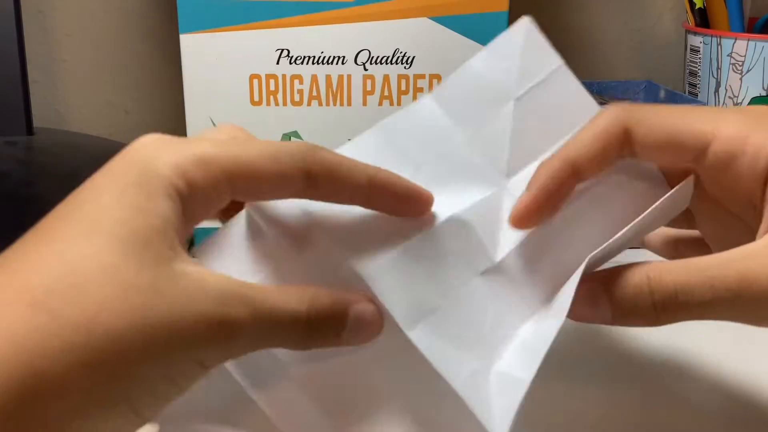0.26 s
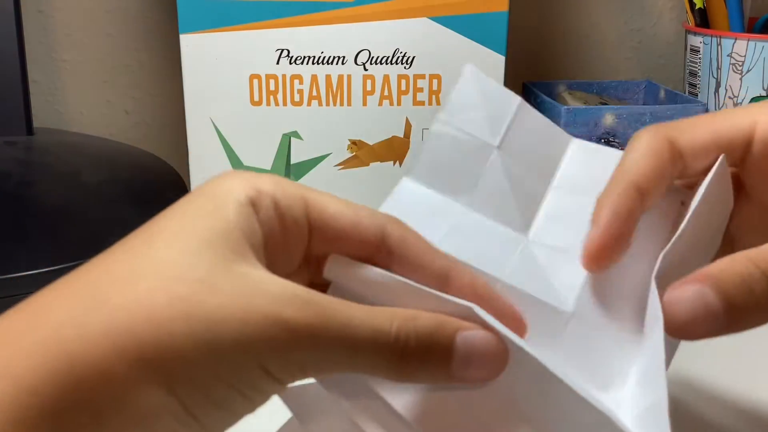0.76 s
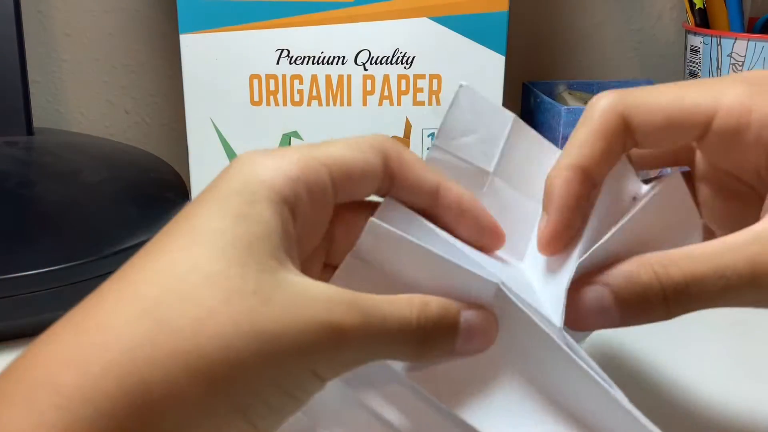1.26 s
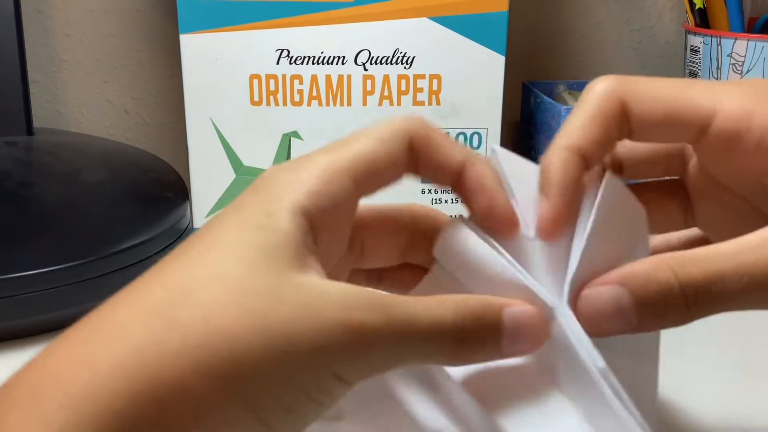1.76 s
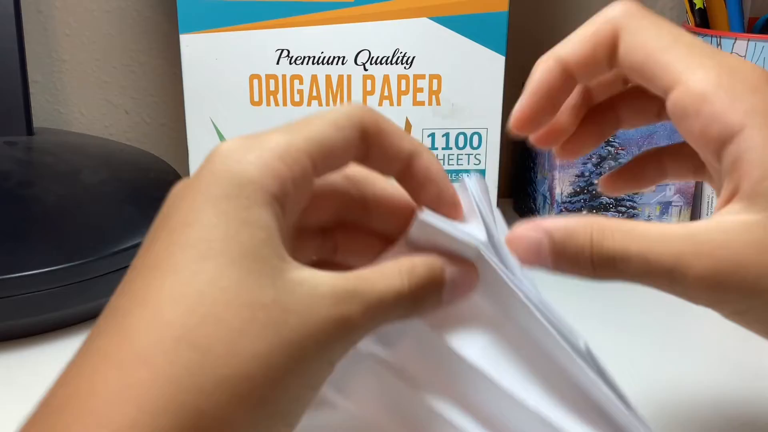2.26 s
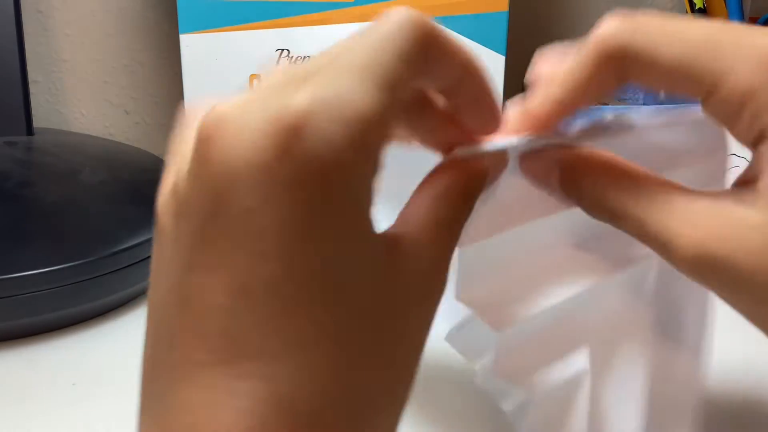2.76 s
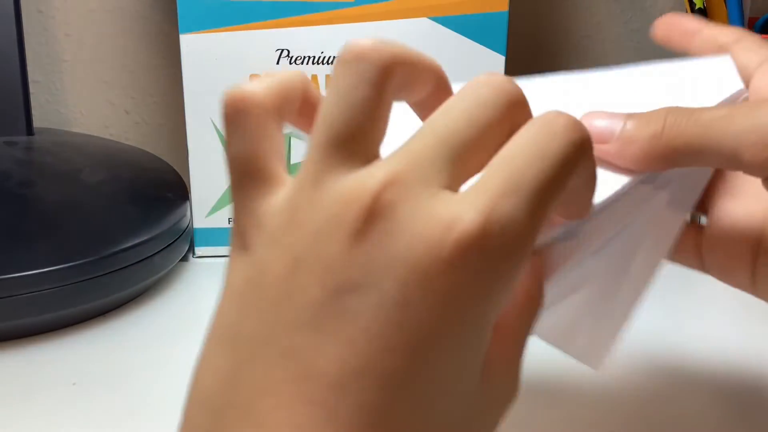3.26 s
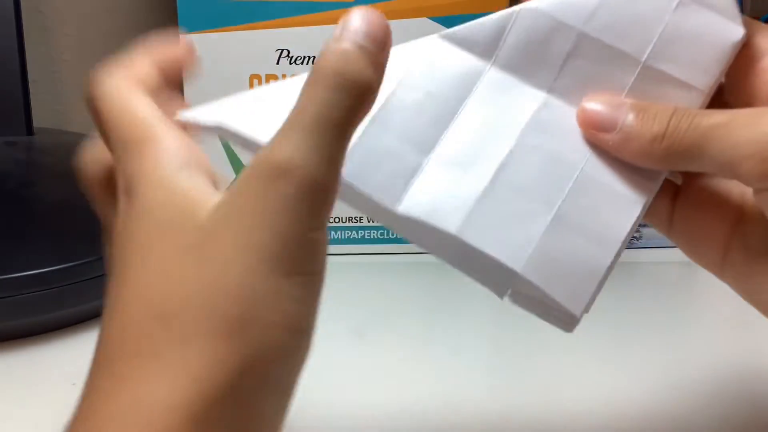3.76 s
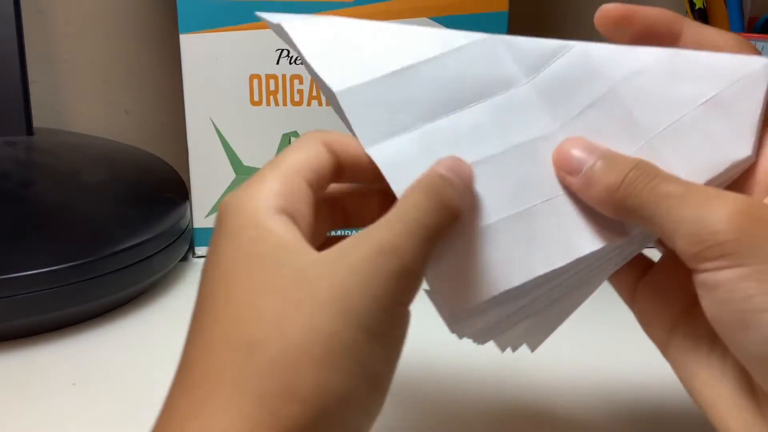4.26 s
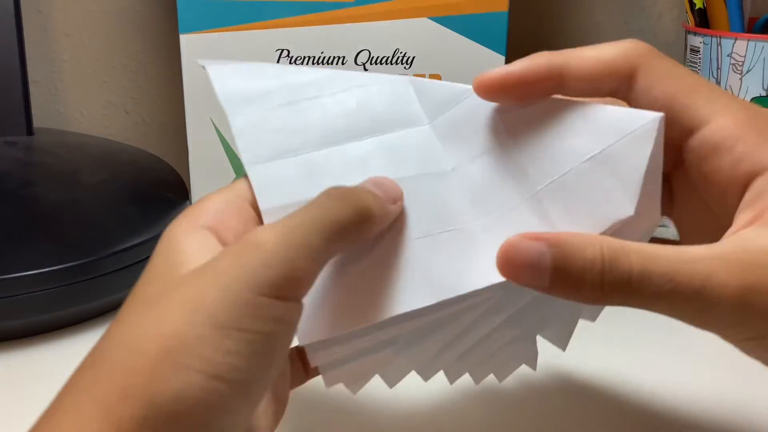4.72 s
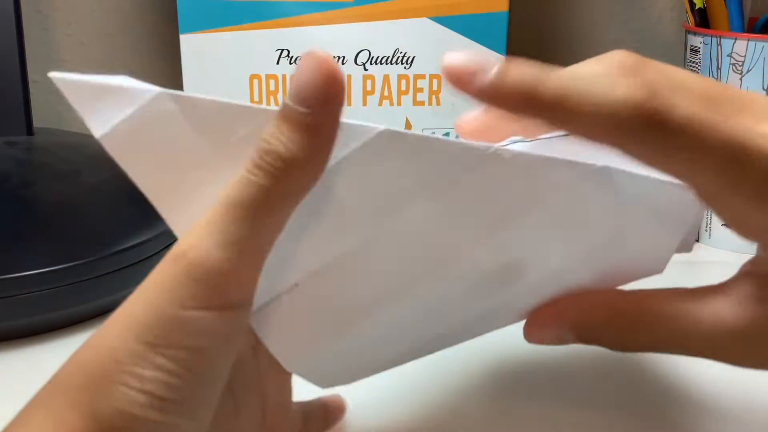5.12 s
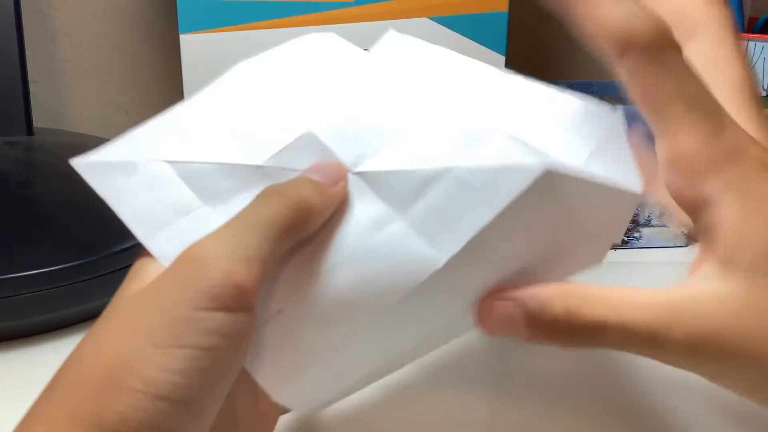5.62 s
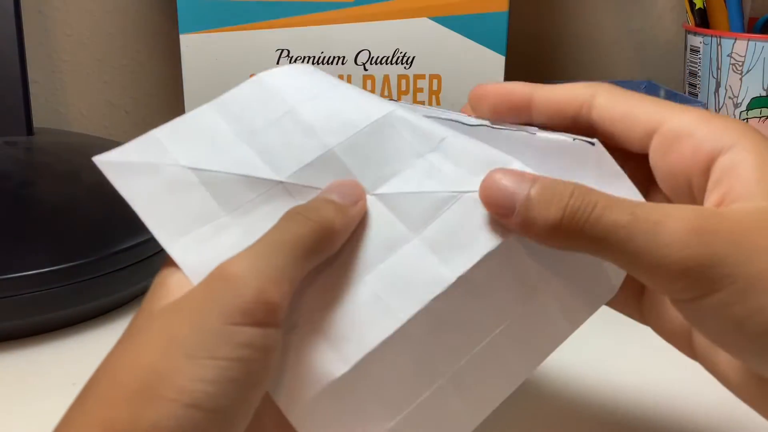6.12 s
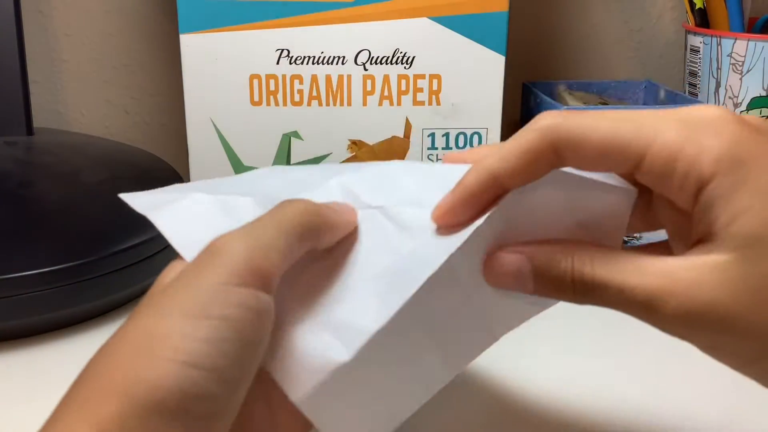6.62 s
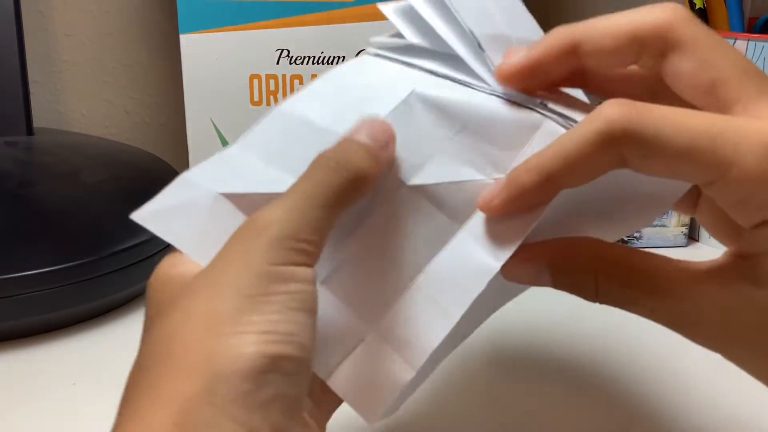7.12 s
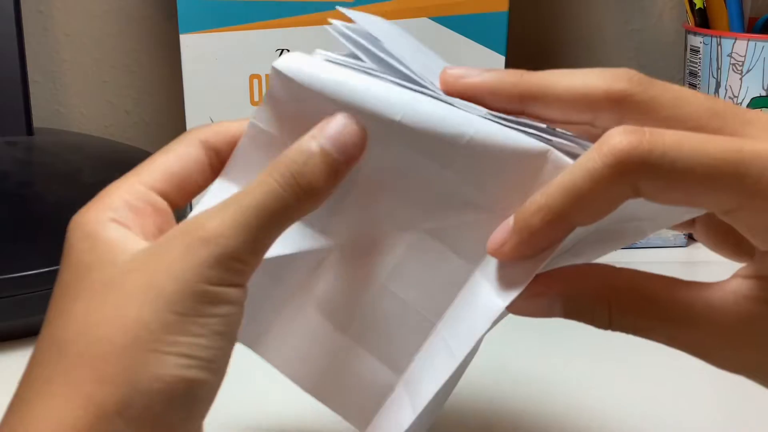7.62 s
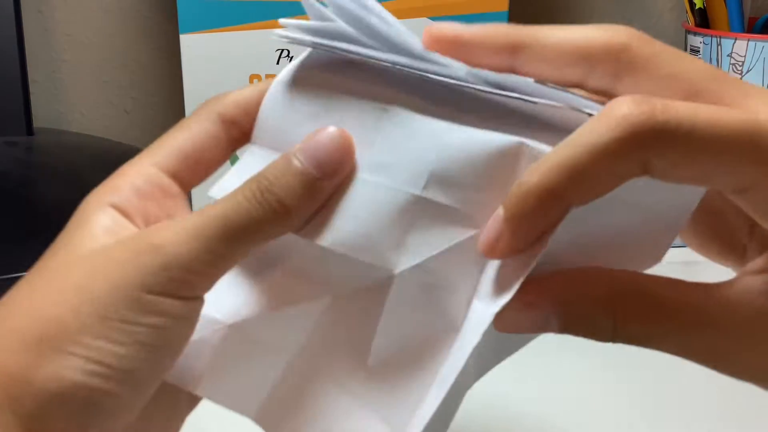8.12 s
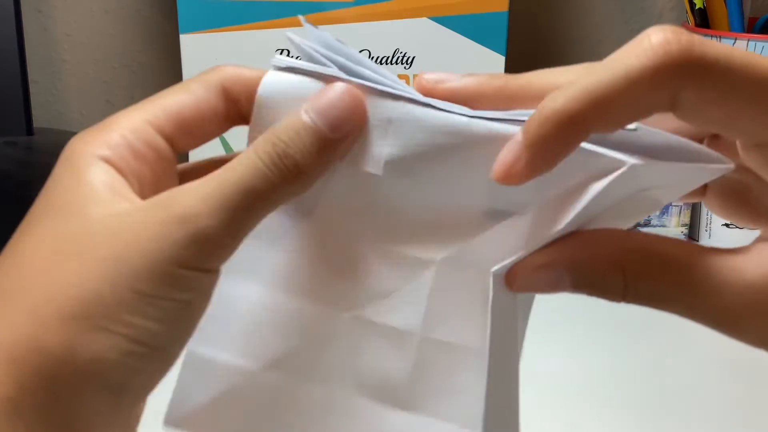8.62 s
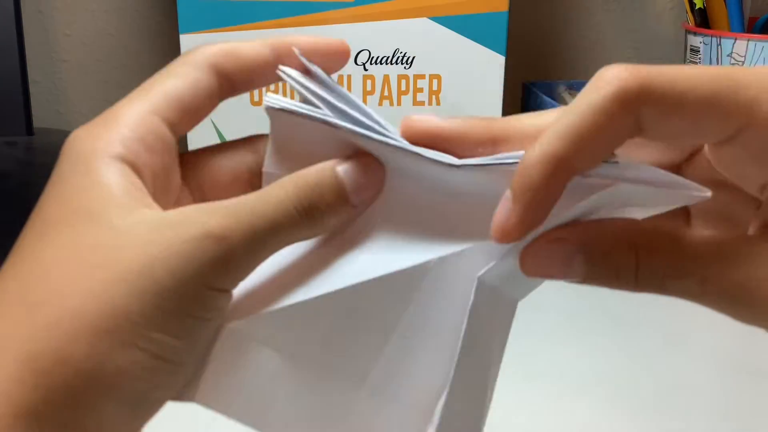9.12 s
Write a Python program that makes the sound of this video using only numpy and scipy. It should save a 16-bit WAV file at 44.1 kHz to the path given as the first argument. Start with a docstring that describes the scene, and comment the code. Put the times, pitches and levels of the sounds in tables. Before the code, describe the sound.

Stiff paper crinkles and pops irregularly as fingers slide and scuff across its layers, close to the microphone in a quiet small room.

```python
"""A pleated sheet of stiff paper is refolded by two hands just in front of a microphone on a desk.
Its facets buckle with short snaps: noisy jolts filtered by the resonances of the sheet.
Between them fingers and layers slide and scuff: noise bursts of friction, with soft bumps on the desk.
The desk reflects the paper and a small room answers faintly, over a low rumble and mains hum."""
import sys
import numpy as np
from scipy import signal
from scipy.fft import rfft, irfft, next_fast_len
from scipy.io import wavfile
from scipy.ndimage import uniform_filter1d, map_coordinates

SR = 44100
rng = np.random.default_rng(int(sys.argv[2]) if len(sys.argv) > 2 else 0)


def master_out(mix):
    """Clip the mix to full scale and print it as 16-bit PCM to the path in sys.argv[1]."""
    frames = np.transpose(np.atleast_2d(mix))
    ceiling = np.clip(frames, -1, 1)
    pcm = np.round(ceiling * 32767).astype(np.int16)
    wavfile.write(sys.argv[1], SR, pcm)


N = 413658
TIME = np.arange(N) / SR


def undb(db):
    """Decibels to gain."""
    return 10 ** (np.asarray(db) / 20)


def unit(x):
    """Scale to an rms of 1."""
    return x / np.sqrt(np.mean(x ** 2) + 1e-30)


def bins(size):
    """Frequencies of a real spectrum in Hz, kept above zero."""
    return np.maximum(np.arange(size // 2 + 1) * SR / size, 1)


def colour(points, hz):
    """Gain of a (pitch_hz, level_db) spectrum, with an added roll-off far above its last point."""
    points_hz, points_db = np.transpose(points)
    level_db = np.interp(np.log(hz), np.log(points_hz), points_db)
    return undb(level_db) / (1 + (hz / (2 * points_hz[-1])) ** 4)


def walk(rate_hz):
    """Random wander with a spread near 1: straight lines between rate_hz random knots per second."""
    knots = rng.standard_normal(N // 20)
    return np.sqrt(1.5) * np.interp(TIME * rate_hz, np.arange(len(knots)), knots)


# resonances of the sheet over the desk: pitch_hz, width_hz, lift_db (at full drive)
SHEET_RESONANCES = [(611, 46, 8.5), (1050, 90, 11), (1332, 49, 14.5), (2123, 247, 11.5), (2820, 160, 5.5),
                    (4000, 50, 4.5), (4530, 91, 5), (5310, 320, 6), (5986, 200, 7.5)]


def sheet(hz, power_shares=1):
    """Gain of the sheet's resonances, each peak driven by its share of power."""
    pitch_hz, width_hz, lift_db = np.transpose(SHEET_RESONANCES)
    peaks = (undb(lift_db) ** 2 - 1) / (1 + (2 * (hz[:, None] - pitch_hz) / width_hz) ** 2)
    return np.sqrt(1 + np.sum(power_shares * peaks, axis=1))


def causal(gain):
    """Minimum-phase spectrum with this gain: it starts at once and rings afterwards."""
    cepstrum = irfft(np.log(gain + 1e-6))
    half = len(cepstrum) // 2
    cepstrum[1:half] *= 2
    cepstrum[half + 1:] = 0
    return np.exp(rfft(cepstrum))


def through_paper(force, points, drive=0.58):
    """A sliding force coloured by the sheet, whose resonances the fingers damp; rms 1."""
    hz = bins(size=2048)
    response = irfft(causal(colour(points, hz) * sheet(hz, drive)))
    return unit(signal.fftconvolve(force, response)[:N])


def slips(rate_hz, spread_db, smooth, slip_ms=1.0):
    """Fibres catch and let go: each slip is a tiny decaying noise burst, over an even friction noise."""
    sizes = undb(spread_db * np.minimum(rng.exponential(size=N), 3))
    starts = (rng.random(N) < rate_hz / SR) * sizes ** 2
    power = signal.lfilter([1], [1, -np.exp(-1000 / (slip_ms * SR))], starts)
    return rng.standard_normal(N) * np.sqrt(power / np.mean(power) + smooth ** 2)


def friction(force, points, waver_db=3.0, drift_oct=.04, count=5):
    """Slips heard through the sheet; as the contact moves, different wavelengths take the lead."""
    size = next_fast_len(N)
    spectrum = rfft(through_paper(force, points), size)
    thirds = 3 * np.log2(bins(size))
    out = 0
    for k in range(count):
        # every fifth third-octave band swells and fades together
        share = np.maximum(1 - np.abs((thirds - k + count / 2) % count - count / 2), 0)
        out = out + irfft(spectrum * share, size)[:N] * undb(waver_db * walk(rate_hz=22))
    # bending stiffens and slackens the sheet, so that its resonances drift
    place = np.cumsum(2 ** (drift_oct * walk(rate_hz=6)))
    return unit(map_coordinates(out, [place], order=3, mode="mirror"))


# strokes of a finger or a layer: start_s, length_s, rub_db (before RUB_GAIN_DB), flex_db,
# hiss_db (before the brightness)
SLIDE_STROKES = [(0, .004, -42, -54, -79), (0.077, .09, -54, -51, -71), (0.195, .095, -38.5, -47, -54),
                 (0.33, 0.083, -60, -55, -49.5), (0.493, .2, -60, -58.5, -46.5),
                 (0.684, .115, -53, -51, -51), (0.879, .18, -51, -55, -51), (1.181, .12, -52, -54, -53),
                 (1.284, .18, -50, -51.5, -45.5), (1.486, .11, -53, -56, -54), (1.616, .1, -46.5, -50, -45),
                 (1.721, .04, -50.5, -58, -51), (1.787, .05, -48, -54.5, -45.5),
                 (1.843, .08, -64, -62, -51), (1.955, .06, -47.5, -55, -48.5),
                 (2.092, .06, -57, -59, -45.5), (2.207, 0.037, -52.5, -55, -49),
                 (2.314, 0.065, -50, -55.5, -45), (2.401, .05, -50.5, -57, -54),
                 (2.505, .085, -50.5, -52.5, -44.5), (2.732, .07, -51.5, -56, -49),
                 (2.8, .06, -51, -50, -53), (2.882, .05, -68, -52, -61), (2.951, .03, -68, -48, -79),
                 (3.022, .08, -55, -55, -65), (3.129, .04, -50, -55, -58), (3.273, .12, -55, -59.5, -53.5),
                 (3.437, .04, -60, -59.5, -55.5), (3.513, .06, -69, -62, -51.5),
                 (3.598, 0.037, -55.5, -66, -58), (3.913, .03, -64, -57, -55),
                 (3.973, .06, -74, -70, -58.5), (4.248, .09, -76, -68, -57.5),
                 (4.354, 0.19, -56, -66, -53.5), (4.605, .11, -57, -59, -72), (4.863, .08, -47, -54, -49),
                 (4.954, .06, -66, -54, -63), (5.064, .07, -49, -52, -51), (5.227, .07, -52.5, -61.5, -59),
                 (5.328, .08, -52, -66, -54.5), (5.43, .05, -53, -66, -59),
                 (5.516, 0.055, -50.5, -55.5, -59), (5.622, .04, -65, -60, -55.5),
                 (5.989, .04, -52.5, -65, -62), (6.106, .05, -52.5, -62, -63), (6.25, .03, -53, -57.5, -81),
                 (6.334, .14, -52.5, -61.5, -49.5), (6.651, 0.064, -48.5, -57, -48),
                 (6.727, 0.15, -54.5, -65.5, -59), (6.873, 0.038, -47, -56.5, -49),
                 (6.941, .06, -51, -63.5, -73), (7.04, .045, -50, -62, -49.5),
                 (7.191, 0.055, -57, -59.5, -51.5), (7.272, .075, -46, -50, -50.5),
                 (7.387, .04, -47.5, -57.5, -52), (7.432, 0.023, -63, -52, -63),
                 (7.491, .02, -46.5, -50, -46.5), (7.613, 0.059, -45, -57, -42),
                 (7.748, .09, -55, -60, -59.5), (7.878, .03, -58, -49, -77),
                 (8.028, .11, -48.5, -53.5, -46.5), (8.153, .1, -51, -57, -52.5),
                 (8.272, .07, -45.5, -53, -44.5), (8.348, .14, -52, -55, -52.5),
                 (8.533, .06, -51, -54.5, -45.5), (8.633, .11, -46, -48, -53),
                 (8.827, .06, -43.5, -57, -48.5), (8.894, 0.12, -64, -56, -49.5),
                 (9.052, .06, -60, -58, -60.5), (9.243, .14, -55.5, -60.5, -48.5)]
SLIDE_ATTACK_S, SLIDE_RELEASE_S = .02, .016  # rise time; time constant of the dying away
# light rubbing of the held sheet between strokes: time_s, rub_db (before RUB_GAIN_DB)
HOLD_RUBBING = [(0, -66), (.035, -78), (.058, -78), (.075, -62), (.155, -62), (.178, -66), (.21, -59),
                (.4, -57.5), (.76, -58), (.835, -62.5), (.9, -59), (2.4, -60), (3.5, -63), (3.68, -79),
                (3.86, -83), (4.0, -67.5), (4.08, -72), (4.3, -65), (4.8, -64), (5.65, -66), (5.8, -81),
                (5.95, -70), (6.28, -72.5), (6.45, -66), (7.5, -62), (7.98, -61), (8.1, -60), (8.55, -60),
                (8.8, -65), (8.95, -60), (9.15, -67), (9.3, -62)]
HOLD_FLEX_DB, HOLD_HISS_DB = -4, 2  # relative to HOLD_RUBBING


def slide_gains():
    """Rub, flex and hiss gains: each stroke rises, holds and dies away over the light contact of the grip."""
    offsets_db = np.array([[0], [HOLD_FLEX_DB], [HOLD_HISS_DB]])
    power = undb(np.interp(TIME, *np.transpose(HOLD_RUBBING)) + offsets_db) ** 2
    for start_s, length_s, *levels_db in SLIDE_STROKES:
        span_s = [start_s - SLIDE_ATTACK_S, start_s + length_s + 10 * SLIDE_RELEASE_S]
        near = slice(*np.searchsorted(TIME, span_s))
        age_s = TIME[near] - start_s
        rise = np.clip(age_s / SLIDE_ATTACK_S + .5, 0, 1)
        stroke = rise * np.exp(-np.maximum(age_s - length_s, 0) / SLIDE_RELEASE_S)
        power[:, near] += np.outer(undb(levels_db), stroke) ** 2
    return np.sqrt(power)


# spectrum of rubbing layers: pitch_hz, level_db
RUB_SPECTRUM = [(400, -21), (700, 0.5), (1200, -7), (1650, -3), (2400, -4.5), (3200, -6.5), (4500, -19),
                (8000, -39)]
# spectrum of the bending sheet: pitch_hz, level_db
FLEX_SPECTRUM = [(90, -18), (200, -2), (350, 7.5), (600, 0), (800, -7), (1300, -45.5)]
# spectrum of hissing layers: pitch_hz, level_db
HISS_SPECTRUM = [(1800, -9.5), (3400, -1), (5500, -2), (6800, -3.5), (9000, -5.5), (12000, -5.5),
                 (16000, -9)]
# brightness of the hiss: time_s, lift_db (above BRIGHT_HZ)
HISS_BRIGHTNESS = [(0, 5), (.55, -4), (2.3, 0), (3.3, 0.5), (3.9, 2.5), (4.4, 2), (4.9, -3), (5.6, 4),
                   (6.4, -0.5), (7.0, -1), (7.65, 0), (8.1, 1), (9.3, -2.5)]
BRIGHT_HZ, RUB_GAIN_DB = 7000, -2  # RUB_GAIN_DB: overall level of the rubbing


def sliding(rub_gain, flex_gain, hiss_gain, flutter_db=1.03):
    """Sliding layers rub and hiss, while the bending sheet gives soft low ticks."""
    rub = friction(slips(rate_hz=280, spread_db=5, smooth=0.6), RUB_SPECTRUM)
    flex = friction(slips(rate_hz=150, spread_db=1, smooth=0.6), FLEX_SPECTRUM)
    hiss = friction(slips(rate_hz=450, spread_db=4.5, smooth=0.9), HISS_SPECTRUM)
    treble = signal.butter(3, BRIGHT_HZ, "high", fs=SR, output="sos")
    lift = undb(np.interp(TIME, *np.transpose(HISS_BRIGHTNESS)))
    hiss = hiss + signal.sosfiltfilt(treble, hiss) * (lift - 1)
    grip = unit(undb(flutter_db * (walk(rate_hz=40) + walk(rate_hz=130))))
    return grip * (rub * rub_gain * undb(RUB_GAIN_DB) + flex * flex_gain + hiss * hiss_gain)


# spectrum of the room rumble: pitch_hz, level_db
RUMBLE_SPECTRUM = [(20, -44), (40, -32.5), (58, -5.5), (90, -1.5), (150, -1), (220, -7), (400, -11),
                   (900, -20.5), (1500, -27), (5000, -29), (16000, -67)]
RUMBLE_DB = -58.5
HUM_HZ, HUM_DB, HUM_WAVER_RAD = 120, -62, .6


def background():
    """Low room rumble of coloured noise, with a mains hum that wavers in phase and level."""
    noise = rng.standard_normal(N)
    rumble = unit(irfft(rfft(noise) * colour(RUMBLE_SPECTRUM, bins(N)), N))
    phase_rad = 2 * np.pi * HUM_HZ * TIME + HUM_WAVER_RAD * walk(rate_hz=9)
    hum = unit(np.sin(phase_rad) * undb(2.2 * walk(rate_hz=11)))
    return undb(RUMBLE_DB) * rumble + undb(HUM_DB) * hum


# buckling facets, from faint ticks to loud snaps: start_s, ring_db, centre_hz (of the ring), flap_db, crack_db
FACET_SNAPS = [(.022, -54.5, 930, -41.5, -74.5), (.098, -30.5, 1510, -36, -44),
               (.117, -54, 2290, -48, -57.5), (.271, -58, 2190, -50, -64), (.3218, -21, 1860, -32.5, -21.5),
               (.6819, -24.5, 2540, -39, -25), (.702, -57, 1000, -39, -54), (.7305, -53, 1400, -45, -45.5),
               (.854, -50.5, 1180, -48, -53), (.901, -47, 1770, -40, -45.5), (1.0997, -37, 1600, -50, -44),
               (1.1275, -41, 1520, -37, -42), (1.174, -36.5, 3020, -46, -41),
               (1.244, -50, 1810, -41, -44.5), (1.3274, -28.5, 1790, -41, -44),
               (1.392, -38.5, 2230, -63, -44.5), (1.406, -45, 1400, -39.5, -45),
               (1.4456, -36.5, 1790, -34, -40.5), (1.5171, -39.5, 1030, -40, -62),
               (1.5625, -43.5, 1650, -48, -44), (1.588, -46, 1980, -46, -43), (1.621, -44, 2000, -54, -44),
               (1.634, -33.5, 1600, -41, -37), (1.675, -39, 1260, -36.5, -53),
               (1.7876, -36.5, 1480, -37.5, -45), (1.861, -54, 1800, -49, -49),
               (1.9474, -42, 2330, -44.5, -43.5), (1.971, -41.5, 1570, -42.5, -50),
               (1.984, -44, 1700, -50, -57), (2.0298, -37.5, 1100, -36, -51),
               (2.3803, -41.5, 1190, -43, -39.5), (2.474, -46.5, 1780, -49, -50),
               (2.493, -47, 1310, -38.5, -42), (2.506, -45, 1600, -54, -50), (2.554, -38, 1760, -46, -41),
               (2.6558, -67, 790, -42, -55), (2.694, -60, 2500, -56, -46.5),
               (2.7224, -43.5, 1030, -42.5, -52), (2.9605, -55, 990, -41.5, -48),
               (2.816, -42.5, 1720, -40, -38.5), (2.8347, -52, 1200, -34.5, -47),
               (2.9834, -46, 990, -39.5, -66), (3.0162, -37, 1420, -40, -37.5), (3.04, -51, 1480, -53, -50),
               (3.084, -48, 1290, -57, -53), (3.1537, -43, 1900, -45.5, -47.5),
               (3.231, -41, 2010, -55, -49), (3.288, -46.5, 1360, -51, -58), (3.398, -52, 1900, -54, -46.5),
               (3.511, -51.5, 1660, -51, -57), (3.868, -71, 2500, -71, -62.5),
               (3.9143, -45.5, 2150, -59, -51), (4.344, -54, 1110, -68, -62),
               (4.4835, -45.5, 1380, -49, -70), (4.502, -47, 1340, -52, -68),
               (4.8814, -33.5, 1600, -46.5, -52), (4.947, -49, 1100, -44.5, -64),
               (4.974, -63, 900, -45, -64), (5.0066, -29, 1910, -36.5, -38),
               (5.0444, -36, 1210, -32.5, -51), (5.06, -31, 1350, -37, -62),
               (5.0947, -38.5, 1720, -52, -40), (5.1087, -45, 1550, -35.5, -52),
               (5.2815, -41.5, 1510, -54, -69), (5.287, -42.5, 1450, -50, -69),
               (5.5209, -29.5, 1500, -34.5, -47), (5.6235, -45, 1240, -38.5, -67),
               (5.7255, -48, 2250, -49.5, -49.5), (5.8245, -48.5, 1340, -55, -88),
               (5.8575, -44.5, 1140, -57, -67), (5.873, -55, 2400, -51, -56.5),
               (5.8956, -40.5, 1100, -53, -54), (5.921, -37, 2750, -43, -46.5),
               (6.001, -50, 1310, -52, -70), (6.0943, -22.5, 2000, -37.5, -37),
               (6.235, -32, 1610, -47, -48), (6.6022, -44, 1180, -51.5, -65),
               (6.779, -33.5, 1730, -43, -45), (6.9045, -30.5, 1600, -40.5, -67),
               (7.991, -48, 2100, -64, -57), (7.273, -41, 1690, -46, -51), (7.288, -35, 1350, -44, -54),
               (7.3035, -27, 2010, -32.5, -35.5), (7.3843, -43.5, 2120, -63, -49.5),
               (7.4598, -46, 1440, -52, -50.5), (7.5513, -35.5, 1860, -38.5, -53),
               (7.595, -40.5, 1340, -44, -61), (7.742, -48, 1500, -47, -46.5),
               (7.7713, -33.5, 1390, -34.5, -51), (7.816, -37.5, 2120, -41.5, -45.5),
               (7.89, -47, 1010, -40.5, -73), (7.9106, -41.5, 1620, -41, -47),
               (8.018, -26, 1720, -41, -36.5), (8.0684, -34, 1110, -38.5, -57),
               (8.098, -48, 1100, -41, -51), (8.2468, -32, 1810, -35.5, -44),
               (8.3155, -33.5, 1220, -39, -42), (8.324, -38.5, 1670, -33, -43),
               (8.337, -43, 1180, -40, -63), (8.449, -36.5, 1150, -38, -52), (8.482, -52, 1000, -49, -62),
               (8.542, -29.5, 2180, -47, -32.5), (8.624, -64, 2470, -70, -45),
               (8.667, -36.5, 1670, -61, -65), (8.683, -53, 1980, -56, -63), (8.69, -29.5, 1830, -38, -39),
               (8.7035, -22, 2960, -28.5, -27.5), (8.7293, -34, 1600, -33.5, -38),
               (8.7423, -28.5, 1006, -28, -39.5), (8.9802, -41.5, 2040, -44, -37),
               (8.991, -51, 2410, -49, -41), (9.0553, -45.5, 1660, -46, -46),
               (9.198, -45.5, 1620, -50.5, -45)]
# spectrum of the ring: pitch_hz, level_db
RING_SPECTRUM = [(450, -15.5), (750, 5.5), (1100, -1), (1550, -5.5), (2400, -2.5), (3200, 1.5), (4500, -4),
                 (8000, -58.5)]
# spectrum of the low flap: pitch_hz, level_db
FLAP_SPECTRUM = [(50, -23), (130, -7), (340, 5), (600, 2.5), (850, -7.5), (1500, -29.5)]
# spectrum of the sharp crack: pitch_hz, level_db
CRACK_SPECTRUM = [(2000, -8), (3700, -0.5), (5600, -2.5), (7000, -3), (10000, -7), (16000, -15)]
# a ring of BUCKLE_DB pops through in BUCKLE_MS; one HALVING_DB louder takes half as long
BUCKLE_MS, BUCKLE_DB, HALVING_DB = 4.16, -34.5, 20.5
# from snap to snap: spread of tuning (share) and of the power driving each resonance
DETUNE, DRIVE_SPREAD_DB = .01, 0.6


def snaps(facets, scatter=0.14, lead_ms=0.48, lag_ms=3.4, lag_hz=280, focus_oct=1.0, flap_stretch=2.7,
          crack_stretch=0.91, damping_ms=16, note_db=4, note_width=0.12, size=2048):
    """A facet strains and pops through; the jolt scatters off creases, its slow bending waves arriving last."""
    pop = size // 16  # sample of the pop
    out = np.zeros(N + 2 * size)
    hz = bins(size)
    ms = (np.arange(size) - pop) / SR * 1000
    delay_ms = lag_ms / np.sqrt(1 + (hz / lag_hz) ** 2)
    dispersion = np.exp(-2j * np.pi * np.cumsum(delay_ms) / 1000 * SR / size)
    span = np.sqrt(.01 * SR / size)  # makes the levels rms over 10 ms
    treble_oct = np.maximum(np.log2(hz / 5000), 0)
    fingers = np.exp(-(ms / damping_ms) ** 2)  # the grip soon stops the ringing
    for start_s, ring_db, centre_hz, flap_db, crack_db in facets:
        buckle_ms = BUCKLE_MS * 2 ** ((BUCKLE_DB - ring_db) / HALVING_DB)
        # the grip changes the tension, and each spot drives the resonances differently
        tuning = 1 + DETUNE * rng.standard_normal()
        shares = undb(2 * DRIVE_SPREAD_DB * rng.standard_normal(len(SHEET_RESONANCES)))  # 2: power
        body = sheet(hz * tuning, shares)
        focus = 1 / (1 + (np.log2(hz / centre_hz) / focus_oct) ** 2) ** 2
        # the facet's own short note stands out of its ring
        note = 1 + (undb(note_db) - 1) / (1 + (2 * (hz / centre_hz - 1) / note_width) ** 2)
        # a crack weaker than the ring loses its top first
        softness = undb(min(crack_db - ring_db, 0) * treble_oct)
        parts = [(colour(RING_SPECTRUM, hz) * focus * note, ring_db, 1),
                 (colour(FLAP_SPECTRUM, hz), flap_db, flap_stretch),
                 (colour(CRACK_SPECTRUM, hz) * softness, crack_db, crack_stretch)]
        for gain, level_db, stretch in parts:
            decay_ms = np.where(ms < 0, lead_ms, max(buckle_ms * stretch, .5))
            jolt = scatter * rng.standard_normal(size) * np.exp(-np.abs(ms) / decay_ms)
            jolt[pop] += rng.choice([-1, 1])  # each part of the snap has a push of random sign
            push = rfft(jolt)
            # scattering spreads the jolt in time, but leaves its broad colour even
            broad = np.sqrt(uniform_filter1d(np.abs(push) ** 2, size=24))
            wave = fingers * irfft(push * causal(gain * body / broad) * dispersion)
            start = int(start_s * SR)
            out[start:start + size] += undb(level_db) * span * unit(wave)
    return out[pop:pop + N]


CRINKLES_PER_S, CRINKLE_DB, CRINKLE_SPREAD_DB = 12, -56, 2.5  # level at the usual slide
USUAL_SLIDE_DB, CRINKLE_DB_PER_SLIDE_DB = -55.5, 0.78  # harder sliding makes them louder
CRINKLE_HZ, CRINKLE_SPREAD_OCT = 1800, 0.47
CRINKLE_FLAP_DB, CRINKLE_CRACK_DB = -4, -1.5  # relative to the ring


def crinkles(rub, flex, count=200):
    """Small facets pop at random, more often while the sheet is bent; rows like FACET_SNAPS."""
    chance = rng.standard_normal((count, 4))
    turns_s = (np.arange(count) + rng.random(count)) / CRINKLES_PER_S
    bending_s = np.cumsum(np.sqrt(flex) / np.mean(np.sqrt(flex))) / SR  # time runs faster in a bend
    rows = []
    for i, (strength, pitch, flap, crack) in zip(np.searchsorted(bending_s, turns_s), chance):
        if i < N:
            effort_db = 10 * np.log10(rub[i] * flex[i]) - USUAL_SLIDE_DB
            ring_db = CRINKLE_DB + CRINKLE_DB_PER_SLIDE_DB * effort_db + CRINKLE_SPREAD_DB * strength
            centre_hz = CRINKLE_HZ * 2 ** (CRINKLE_SPREAD_OCT * pitch)
            flap_db = ring_db + CRINKLE_FLAP_DB + CRINKLE_SPREAD_DB * flap
            crack_db = ring_db + CRINKLE_CRACK_DB + CRINKLE_SPREAD_DB * crack
            rows.append((TIME[i], ring_db, centre_hz, flap_db, crack_db))
    return rows


# quick scuffs of an edge over a layer: start_s, length_s, rub_db, hiss_db
EDGE_SCUFFS = [(0.142, 0.019, -42, -58), (0.934, 0.0074, -53, -44), (0.977, 0.053, -55, -47),
               (1.686, 0.0075, -33.5, -34), (2.203, 0.025, -60, -35.5), (2.343, 0.0076, -57, -39),
               (2.903, 0.021, -56, -41.5), (3.254, 0.023, -50.5, -47.5), (3.363, 0.036, -68, -45.5),
               (3.908, 0.012, -61, -48), (4.101, 0.0086, -53, -47.5), (5.215, 0.024, -48.5, -49.5),
               (6.65, 0.013, -57, -42.5), (6.815, 0.012, -51, -39.5), (6.971, 0.01, -61, -44.5),
               (7.156, 0.016, -50, -46.5), (7.24, 0.021, -42.5, -48.5), (7.812, 0.0065, -40, -40),
               (8.193, 0.0095, -43, -41), (8.224, .011, -38, -42), (8.5156, 0.032, -38, -32.5),
               (9.232, 0.019, -45.5, -42.5)]


def scuffs(edge_s=0.0028):
    """An edge skids across a layer in a short run of dense slips."""
    rub = through_paper(slips(rate_hz=1700, spread_db=2.2, smooth=0.8), RUB_SPECTRUM)
    hiss = through_paper(slips(rate_hz=1700, spread_db=2.2, smooth=0.8), HISS_SPECTRUM)
    out = np.zeros(N)
    for start_s, length_s, rub_db, hiss_db in EDGE_SCUFFS:
        end_s = start_s + length_s
        corners_s = [start_s - edge_s, start_s + edge_s, end_s - edge_s, end_s + 2 * edge_s]
        gate = np.interp(TIME, corners_s, [0, 1, 1, 0])
        out += gate * (rub * undb(rub_db) + hiss * undb(hiss_db))
    return out


# soft bumps of the hands against the desk: start_s, level_db
DESK_BUMPS = [(5.100, -50.5)]


def bumps(pitch_hz=78, length_s=0.04):
    """The heel of a hand gives the desk a short, dull push."""
    out = np.zeros(N)
    for start_s, level_db in DESK_BUMPS:
        age_s = np.clip(TIME - start_s, 0, length_s)
        swell = 2 * np.sin(np.pi * age_s / length_s)
        out += undb(level_db) * swell * np.sin(2 * np.pi * pitch_hz * age_s)
    return out


def desk(x, lag_s=0.001104, bounce=0.28, dull_hz=3500):
    """The desk top reflects the sheet, dulled by the hands; as they move, the extra path and colour shift."""
    moving_lag_s = lag_s * 2 ** (.35 * walk(rate_hz=5))
    dull = signal.sosfilt(signal.butter(1, dull_hz, fs=SR, output="sos"), x)
    return x + bounce * np.interp(TIME - moving_lag_s, TIME, dull)


ROOM_T60_S, ROOM_DB = 0.3, -22  # decay by 60 dB; tail energy before dulling


def room(x, first_s=0.0012, dull_hz=9500):
    """Walls return a faint, duller tail a little after the direct sound."""
    t = TIME[:SR // 2]
    tail = rng.standard_normal(len(t)) * undb(-60 * t / ROOM_T60_S) * np.minimum(t / first_s, 1) ** 2
    tail = tail / np.sqrt(np.sum(tail ** 2))
    tail = signal.sosfilt(signal.butter(1, dull_hz, fs=SR, output="sos"), tail)
    return undb(ROOM_DB) * signal.fftconvolve(x, tail)[:N]


def scene():
    """The paper, the desk, their room and the background."""
    rub, flex, hiss = slide_gains()
    pops = snaps(FACET_SNAPS) + snaps(crinkles(rub, flex))
    paper = desk(pops + sliding(rub, flex, hiss) + scuffs())
    return (paper + room(paper) + bumps() + background())[None]


def record(dry):
    """The microphone has a narrow dip in the treble; the recorder cuts the deep bass and the top."""
    coloured = (dry + signal.lfilter(*signal.iirnotch(6400, 22, fs=SR), dry)) / 2
    thinned = signal.sosfilt(signal.butter(7, 50, "high", fs=SR, output="sos"), coloured)
    return signal.sosfilt(signal.ellip(10, .2, 70, 15750, fs=SR, output="sos"), thinned)


dry = scene()
out = record(dry)
master_out(out)
```